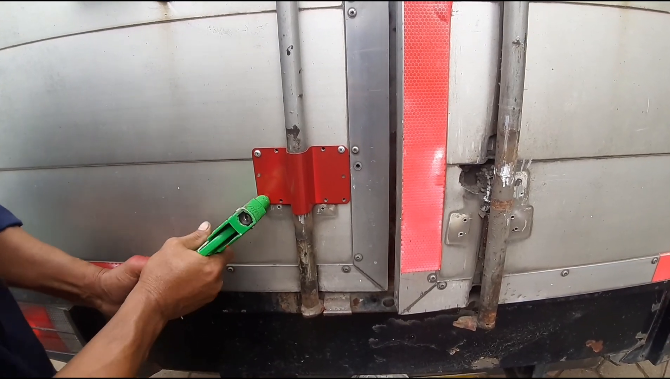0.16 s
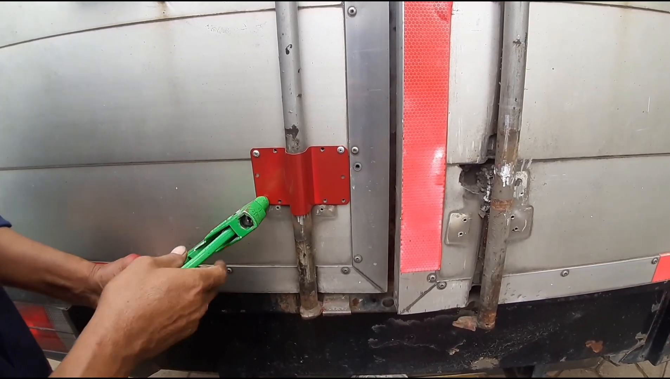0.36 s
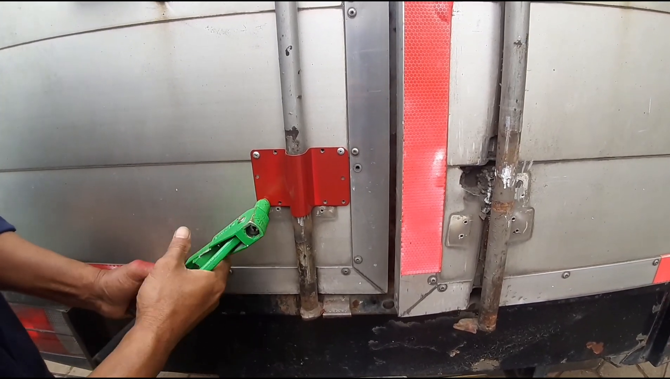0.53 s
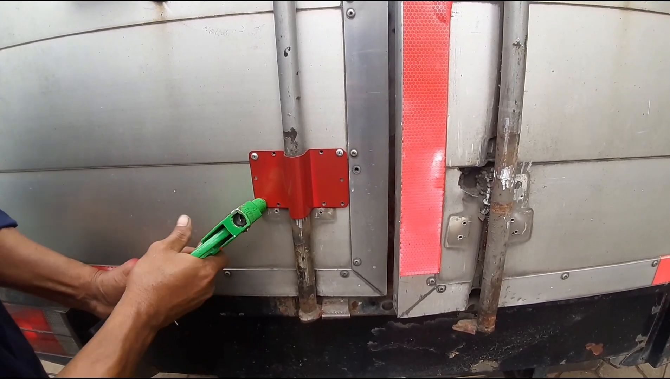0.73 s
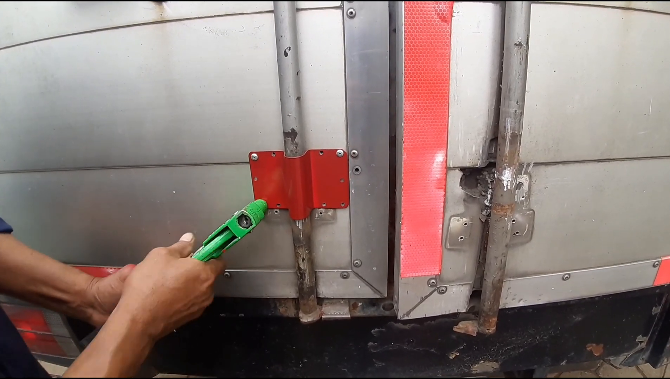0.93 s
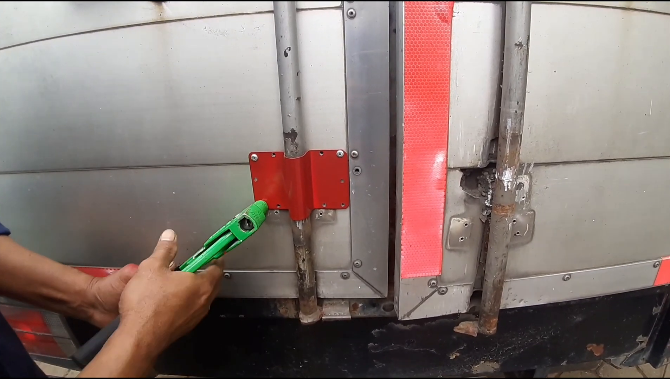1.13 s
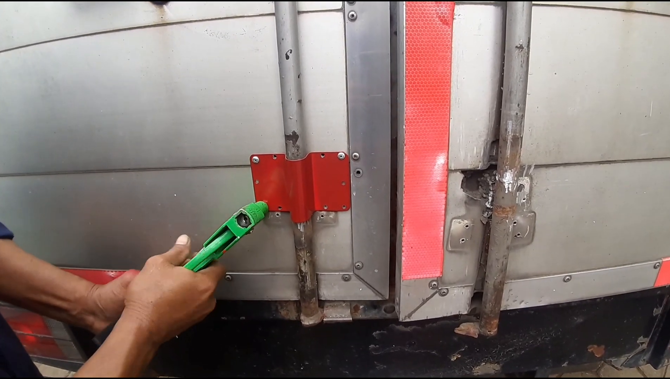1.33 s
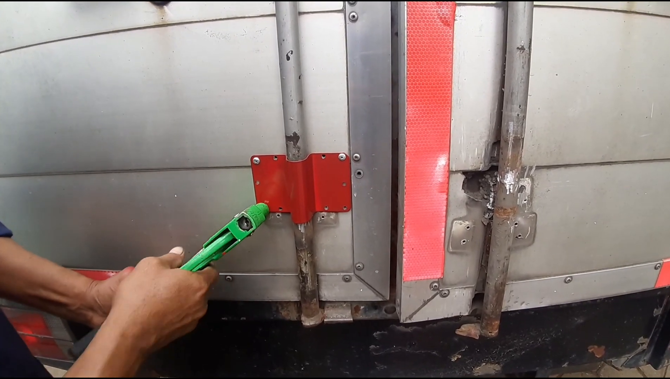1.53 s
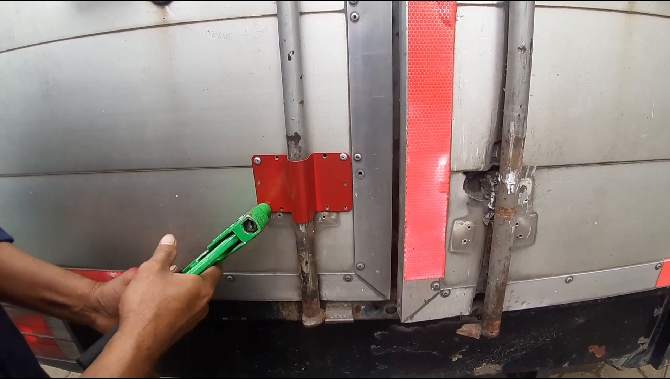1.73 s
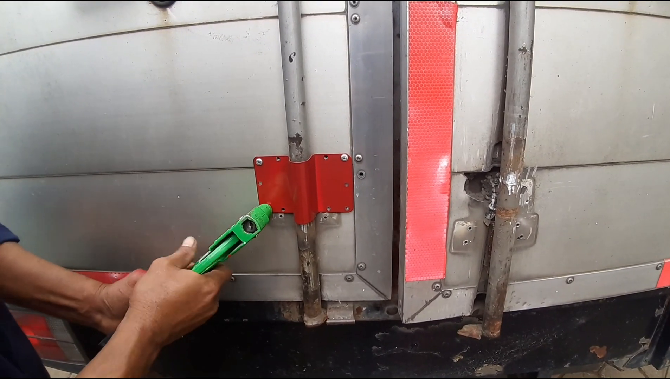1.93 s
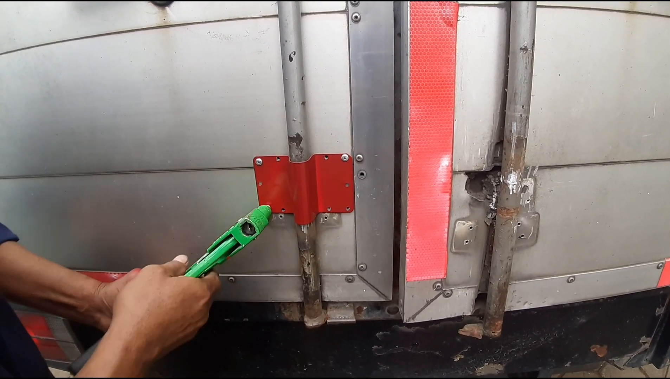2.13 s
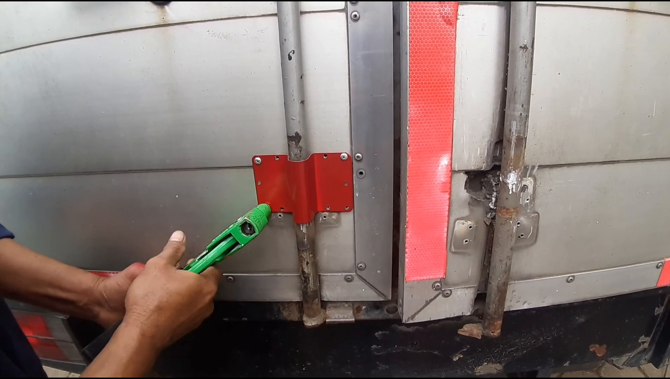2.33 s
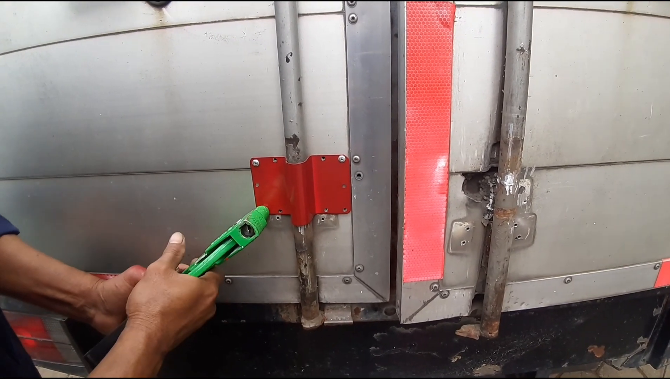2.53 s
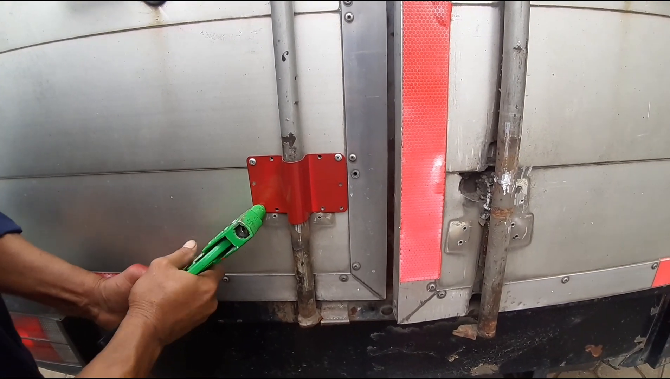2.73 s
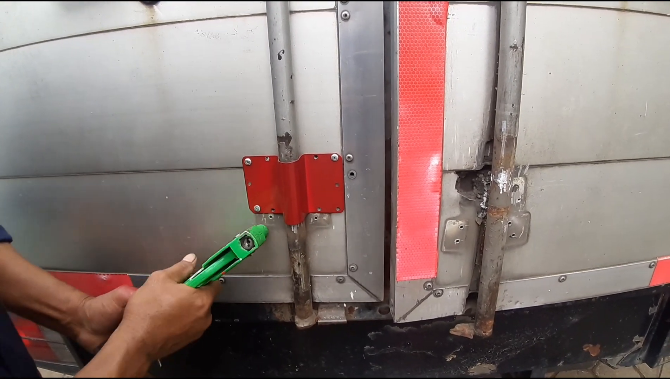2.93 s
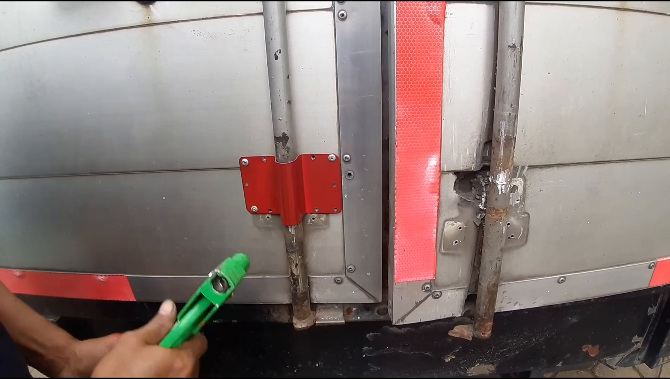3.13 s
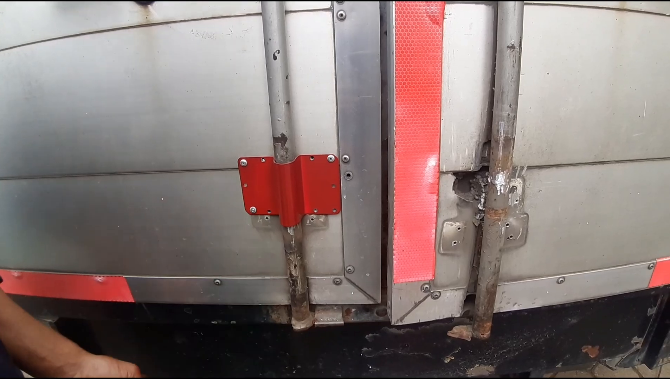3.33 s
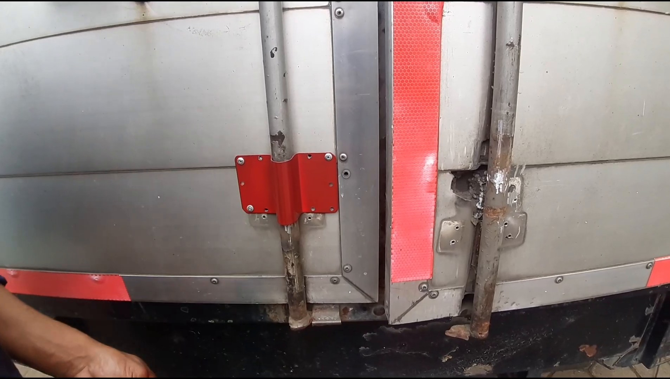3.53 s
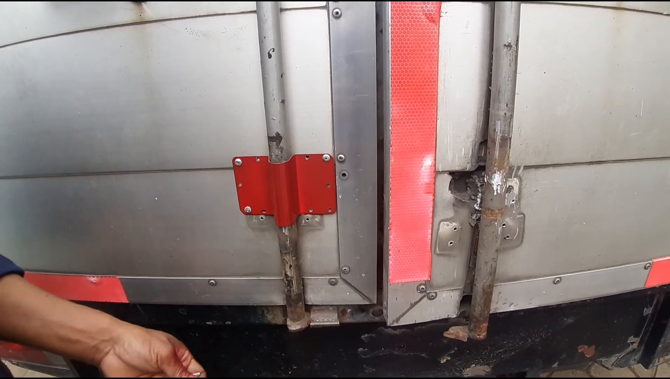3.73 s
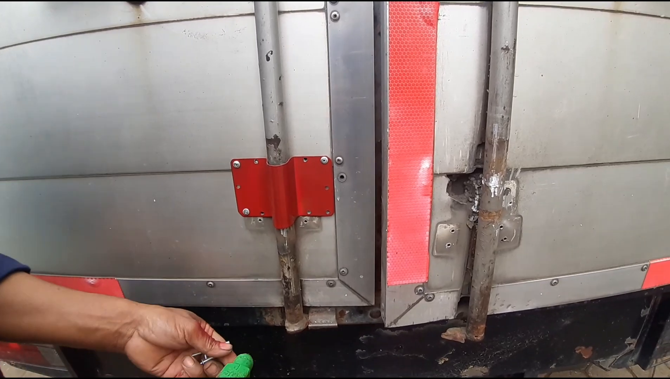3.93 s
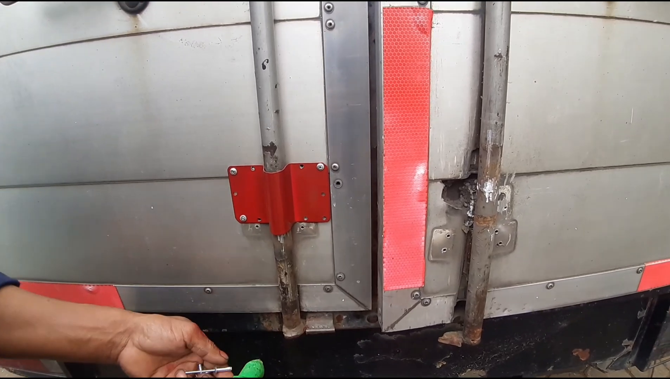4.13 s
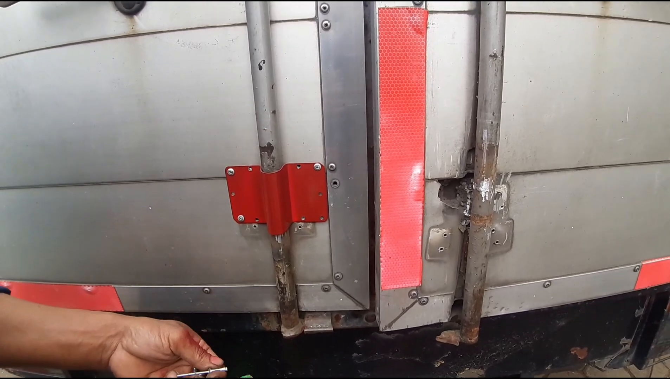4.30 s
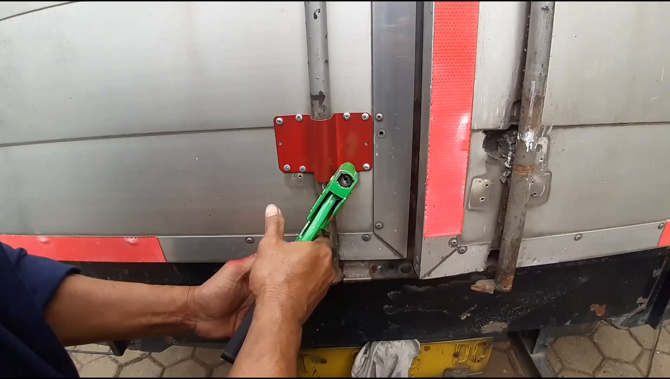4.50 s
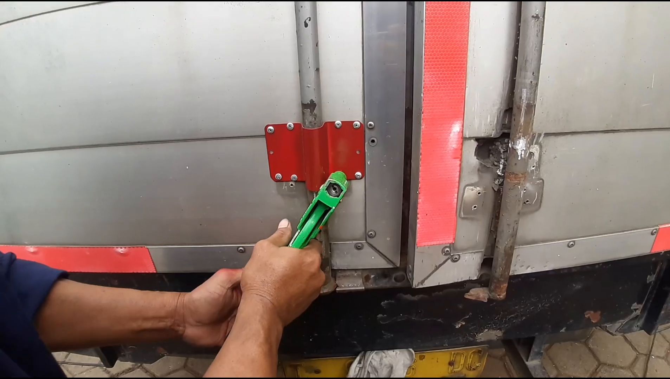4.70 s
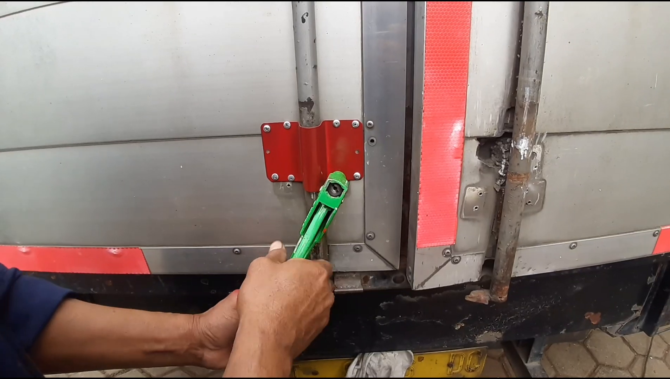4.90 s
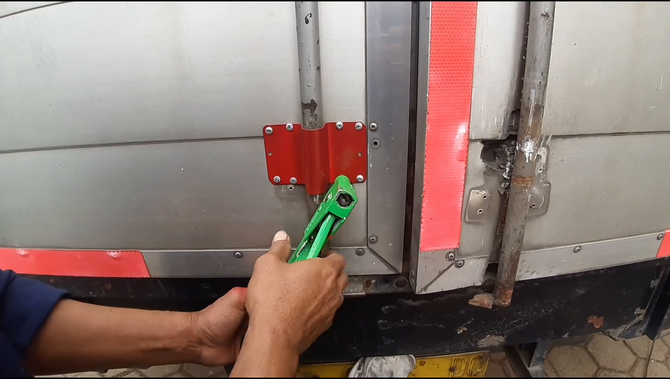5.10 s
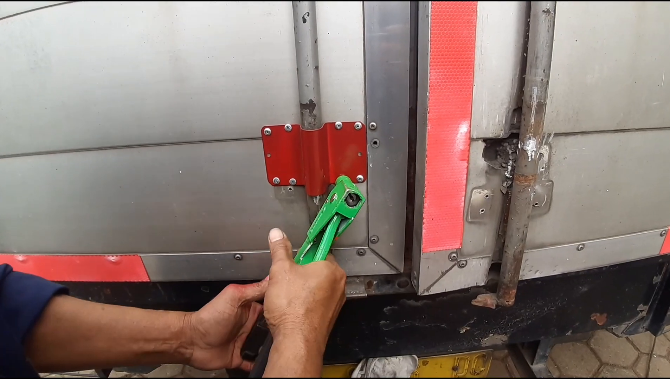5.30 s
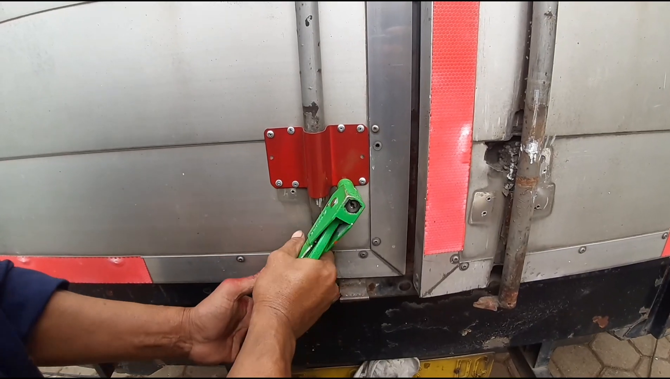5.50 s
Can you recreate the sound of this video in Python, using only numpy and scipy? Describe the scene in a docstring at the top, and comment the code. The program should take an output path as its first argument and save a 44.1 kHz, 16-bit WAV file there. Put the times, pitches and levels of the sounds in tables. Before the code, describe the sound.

Metallic ratcheting clacks of a hand riveter thud into hollow sheet metal, a hard crack follows, loose metal clinks, and riveting resumes.

```python
"""A hand rivet gun is pumped against a steel plate on the sheet-metal door of a truck, in a workshop yard.
Each stroke clicks, slips and stops in the gun (short shaped noise, ringing modes) and booms in the door
(slower shaped noise, modes); then the mandrel snaps. Linkage, spring and handle tick and ring.
Loose metal clinks as the gun is reloaded, and the nose is set on the next rivet.
Rumble and hiss (filtered noise) rise while the gun is held against the door."""
import sys
import numpy as np
from scipy import signal
from scipy.fft import rfft, irfft, next_fast_len
from scipy.io import wavfile
from scipy.ndimage import uniform_filter1d, map_coordinates

SR = 44100
rng = np.random.default_rng(int(sys.argv[2]) if len(sys.argv) > 2 else 0)


def transcribe(u):
    """Save the signal u as a 16-bit wav file named by the first command-line argument.

    u: samples, shape (n,) or (channels, n), limited to [-1, 1]; the rate is SR.
    q: integer samples, one column per channel.
    """
    v = np.clip(np.atleast_2d(u).T, -1, 1)
    q = np.round(v * 32767).astype(np.int16)
    wavfile.write(sys.argv[1], SR, q)


N = 244799
HIT_SIZE = 20000  # samples

# levels in all tables are relative
# spectrum of the sharp edge of a contact: f/Hz, level/dB
EDGE_SPECTRUM = [(7000, -31), (9500, -10), (12000, 1.5), (16000, -2.5)]


def from_db(db):
    """Decibels to gain."""
    return 10 ** (np.asarray(db) / 20)


def at_hz(points, size):
    """A table over log frequency, read at the bins of a transform."""
    hz, value = np.transpose(points)
    bin_hz = np.arange(size // 2 + 1) * SR / size
    return np.interp(np.log(bin_hz + 1), np.log(hz), value)


def causal(magnitude):
    """Causal (minimum-phase) filter with the given magnitude, by folding the cepstrum."""
    cepstrum = irfft(np.log(magnitude + 1e-12))
    half = len(cepstrum) // 2
    cepstrum[1:half] *= 2
    cepstrum[half + 1:] = 0
    return np.exp(rfft(cepstrum))


def colour(x, points):
    """Filter a signal by a spectrum."""
    size = 2 * next_fast_len(x.shape[-1] // 2 + HIT_SIZE // 8)
    response = causal(from_db(at_hz(points, size)))
    return irfft(rfft(x, size) * response, size)[..., :x.shape[-1]]


def resonate(burst, spectrum, count):
    """A burst takes on a body's spectrum; only detail finer than count bins is left to chance."""
    bins = rfft(burst)
    power = uniform_filter1d(np.mean(np.abs(bins) ** 2, axis=0), count)
    wanted = from_db(at_hz(spectrum, burst.shape[-1]))
    return irfft(bins * causal(wanted / np.sqrt(np.abs(power) + 1e-12)))


def diffuse(size):
    """Stereo noise, alike in the bass and unrelated in the treble."""
    # likeness of diffuse sound at the two ports: f/Hz, likeness/0-1
    likeness = [(100, 1), (300, 0.94), (700, 0.68), (1300, 0), (2500, 0.09), (16000, 0)]
    alike = np.clip(at_hz(likeness, size), 0, 1)
    mid, side = rfft(rng.standard_normal((2, size)))
    return irfft(np.sqrt(1 + alike) * mid + np.sqrt(1 - alike) * side * [[1], [-1]], size)


def spread_over(x, seconds):
    """Scale to the energy of a signal of rms 1 that lasts so long."""
    energy = np.mean(np.sum(x ** 2, axis=-1))
    return x * np.sqrt(seconds * SR / (energy + 1e-20))


def add(out, s, x):
    """Mix a sound in at a time."""
    start = max(round(s * SR), 0)
    out[..., start:start + x.shape[-1]] += x[..., :N - start]


def fade(t60_s, size=HIT_SIZE):
    """Exponential decay."""
    return np.exp(-np.log(1000) * np.arange(size) / SR / max(t60_s, 1e-3))


def swell(rise_s):
    """Build-up of a vibration that spreads through a body."""
    return 1 - np.exp(-np.arange(HIT_SIZE) / SR / max(rise_s, 1e-5))


def ring(times, levels_db, modes, vary_db):
    """Decaying sines: each blow strikes every mode with a strength of its own."""
    out, t = np.zeros(N), np.arange(HIT_SIZE) / SR
    shapes = np.array([from_db(db) * fade(t60_s) * np.sin(2 * np.pi * hz * t) for hz, db, t60_s in modes])
    strengths = from_db(vary_db * rng.standard_normal((len(times), len(modes))))
    for s, db, strength in zip(times, levels_db, strengths):
        add(out, s, from_db(db) * (strength @ shapes))
    return out


def ticks(times, levels_db, t60s, spectra, own=0.88, size=3072):
    """Hard contacts: a crowd of modes damped within milliseconds, radiating unevenly to the two ports."""
    out = np.zeros((2, N))
    for s, db, t60_s, spectrum in zip(times, levels_db, t60s, spectra):
        noise = rng.standard_normal((3, size))
        burst = (noise[0] + own * noise[1:]) * fade(t60_s, size)  # shared noise + each port's own
        tick = resonate(burst, spectrum, count=71)
        add(out, s, from_db(db) * spread_over(tick, .005))
    return out


def sheet(times, levels_db, spectrum, envelope, count):
    """Blows on sheet metal: dense modes radiating from the whole surface."""
    out = np.zeros((2, N))
    for s, db in zip(times, levels_db):
        burst = resonate(diffuse(HIT_SIZE) * envelope, spectrum, count)
        add(out, s, from_db(db) * spread_over(burst, .05))
    return out


def in_yard(x, wet_db, t60_s, rise_s, far_db=-24, far_t60_s=0.99):
    """Direct sound from a little to the left, reflections off the door, then a faint tail from far walls."""
    # where the gun is, as the lead of the left port: t/s, lead/s
    left_lead = [(0, .00013), (3.1, .00011), (4.0, 0.000081), (4.5, 0.000074), (5.55, 0.000058)]
    n = np.arange(N)
    lead_samples = np.interp(n / SR, *np.transpose(left_lead)) * SR
    direct = np.array([x[0], map_coordinates(x[1], [n - lead_samples], order=3)])
    decay = (fade(t60_s) + from_db(far_db) * fade(far_t60_s)) * swell(rise_s) ** 2
    echoes = spread_over(diffuse(HIT_SIZE) * decay, 1 / SR)
    return direct + from_db(wet_db) * signal.fftconvolve(x, echoes, axes=1)[:, :N]


def background():
    """Low rumble and a soft hiss, both stronger while the gun is pressed on the door."""
    # gun held against the door: start/s, end/s
    press_spans = [(0.0, 2.45), (4.489, 5.55)]
    # noise spectra: f/Hz, level/dB
    rumble_spectrum = [(20, -23), (40, -11), (60, -3), (100, 0.5), (140, -3), (250, -6), (400, -10.5),
                       (800, -18.5), (1500, -35), (5000, -35.5)]
    hiss_spectrum = [(400, -4.5), (1200, 1), (3000, 2), (3600, -2), (3880, -2), (4200, -3), (7500, -4),
                     (10000, -14), (16000, -14)]
    attack_s, release_s = 0.057, 0.9
    rumble_db, rumble_rise_db = -53.5, 11.5
    hiss_db, hiss_rise_db = -56, 11

    t = np.arange(N) / SR
    pressed = np.zeros(N)
    for start, end in press_spans:
        pressed += np.interp(t, [start - attack_s, start, end, end + release_s], [0, 1, 1, 0])

    def noise(spectrum):
        """Steady diffuse noise of rms 1."""
        return spread_over(colour(diffuse(next_fast_len(N))[:, :N], spectrum), N / SR)

    rumble = from_db(rumble_db + rumble_rise_db * pressed) * noise(rumble_spectrum)
    hiss = from_db(hiss_db + hiss_rise_db * pressed) * noise(hiss_spectrum)
    return rumble + hiss


def loose_metal():
    """A steel pin rings freely; something hard put down nearby clacks, duller, through the yard."""
    # pin clinks, clacks: t/s, level/dB
    clinks = [(3.943, -33.5), (3.972, -24), (4.415, -46)]
    clacks = [(4.0982, -18), (4.150, -33)]
    # impact spectra: f/Hz, level/dB
    pin_spectrum = [(1500, -12), (3500, -5), (4200, -1.5), (6000, -5.5), (8000, -0.5), (16000, -5.5)]
    clack_spectrum = [(80, -26), (280, -7), (450, 6), (850, 9.5), (1300, 4), (2300, 9.5), (3300, 3.5),
                      (5000, 0.5), (7000, 4), (10000, -2), (16000, -5)]
    # modes: f/Hz, level/dB, t60/s
    pin_modes = [(3330, -11, 0.15), (4040, -5, 0.14), (4050, -11, 0.11), (4550, -7.5, .15),
                 (5496, -10, 0.18), (6200, -12, 0.11), (6745, -16, 0.13), (7250, -18, 0.11),
                 (7795, -15, .2), (8120, 1, 0.077), (12760, -8, 0.23), (15100, -10, .1)]
    clack_modes = [(2240, -17, 0.25), (2520, -15, 0.12), (2760, -1.5, 0.061), (3300, -16, 0.28),
                   (3880, -6.5, 0.14), (5270, -16.5, 0.17), (6288, -28, 0.29), (6961, -24, 0.11),
                   (7601, -33, 0.51)]

    s, db = np.transpose(clinks)
    pin = ring(s, db - 8, pin_modes, vary_db=0.5)
    pin = pin + ticks(s, db - 2.0, np.full(len(s), .05), [pin_spectrum] * len(s))
    s, db = np.transpose(clacks)
    clack = ticks(s, db, np.full(len(s), .07), [clack_spectrum] * len(s))
    clack += ring(s, db - 7.5, clack_modes, vary_db=1.5)
    pin_heard = in_yard(pin, wet_db=-1.5, t60_s=0.14, rise_s=0.0013)
    return pin_heard + in_yard(clack, wet_db=-2.0, t60_s=0.22, rise_s=0.0012)


def singing_steel():
    """Close pairs of modes in the spring and the handle beat as they die away."""
    # spring set singing, handle swinging free: t/s, level/dB
    twangs = [(.366, -39), (1.003, -26.5), (1.4, -28.5), (1.59, -21.5), (2.16, -55), (2.815, -22)]
    handle_rings = [(0.481, -43), (1.129, -38), (2.81, -21), (3.224, -44.5), (3.531, -56), (5.097, -46)]
    # modes: f/Hz, level/dB, t60/s
    spring_modes = [(7700, -24, .25), (7833, 0.5, 0.16), (7970, 0, 0.14), (7860, -5, 0.15),
                    (8170, -14, .18)]
    handle_modes = [(3000, -18, .3), (3807, -3, 0.57), (3887, 9, 0.14), (3940, -7, 0.3)]
    spring = ring(*np.transpose(twangs), spring_modes, vary_db=4.0)
    handle = ring(*np.transpose(handle_rings), handle_modes, vary_db=0.5)
    both = from_db(-1.5) * spring + from_db(-5.5) * handle
    return in_yard(np.array([both, both]), wet_db=-13.5, t60_s=0.18, rise_s=0.0018)


def linkage():
    """Small loose parts tick, each around one short-lived pitch."""
    # ticks: t/s, level/dB, pitch f/Hz, sharp edge level/dB
    pings = [(0.65, -37, 8400, -58), (0.662, -26.5, 8430, -44), (0.727, -32, 6700, -41),
             (1.134, -27.5, 6680, -59), (1.2972, -31, 6680, -39), (1.726, -31, 6670, -41),
             (1.884, -31, 6730, -43), (2.301, -27.5, 6670, -40), (4.5115, -26, 6120, -34),
             (5.3573, -34, 6500, -38)]
    s, db, hz, edge_db = np.transpose(pings)
    bells = [[(0.3 * f, -32), (0.936 * f, -13), (f, 0), (1.055 * f, -12), (2.2 * f, -26)] for f in hz]
    t60s = np.full(len(s), .028)
    clicks = ticks(s, db + .5, t60s, bells) + ticks(s, edge_db + 8, t60s, [EDGE_SPECTRUM] * len(s))
    return in_yard(clicks, wet_db=-18.5, t60_s=0.26, rise_s=0.0015)


def hollow_note():
    """The nose drags on the plate and sets off its hollow note, a few damped modes."""
    # drags: t/s, level/dB
    drags = [(4.812, -25), (4.921, -31), (4.94, -33), (4.962, -15.5), (5.097, -31.5)]
    # modes: f/Hz, level/dB, t60/s
    hollow_modes = [(927, 3, 0.1), (989, -2, 0.053), (1100, -16, 0.065)]
    return ring(*np.transpose(drags), hollow_modes, vary_db=1)


def door(blows):
    """The plate answers quickly, with modes set by where it is struck; the wide panel builds up and booms."""
    # spectra of panel boom, plate knock, plate clank: f/Hz, level/dB
    boom_spectrum = [(30, -34.5), (55, -27), (80, -9.5), (100, 5.5), (135, -8), (165, -2), (200, -6),
                     (250, -7), (330, -8.5), (700, -49.5)]
    knock_spectrum = [(180, -20.5), (290, -2.5), (370, 4), (450, -1.5), (535, 2.5), (610, 5.5), (720, -9),
                      (900, -6.5), (2000, -34.5)]
    clank_spectrum = [(450, -18), (760, -0.5), (930, 1), (1050, -1), (1300, -2.5), (1700, -10.5),
                      (4000, -37)]
    # modes of panel, plate struck at left edge, plate struck at right edge: f/Hz, level/dB, t60/s
    panel_modes = [(99, -3.5, 0.15), (117.5, -8, 0.48), (162.2, -1, 0.21), (234, -6, 0.23)]
    left_edge_modes = [(463, -10, 0.36), (529.6, -2.5, 0.21), (584, -7, 0.074), (621.5, 2, 0.18),
                       (715, -5, 0.13), (953, -14.5, 0.3)]
    right_edge_modes = [(370.4, 2.5, 0.2), (426, -3.5, 0.28), (930, 3.5, 0.071), (1200, -21, 0.14),
                        (1730, -13, 0.088), (1885, -2.5, 0.084), (2080, -10, 0.18), (2488, 1.5, .07)]
    move_s, panel_delay_s = 4.3, 0.00597  # the gun moves from left edge to right edge at move_s

    s, boom_db, knock_db, clank_db, ring_db = np.transpose(blows)
    boom = sheet(s, boom_db - 2.5, boom_spectrum, fade(0.28) * swell(0.0027), count=17)
    knock_envelope = (fade(0.06) + .5 * fade(0.34)) * swell(0.0013)
    knock = sheet(s, knock_db - 3.0, knock_spectrum, knock_envelope, count=55)
    clank_envelope = (fade(0.1) + 0.22 * fade(0.47)) * swell(0.00067)
    clank = sheet(s, clank_db - .8, clank_spectrum, clank_envelope, count=111)
    panel = ring(s + panel_delay_s, boom_db - 0.5, panel_modes, vary_db=3.5)
    left = s < move_s
    plate = ring(s[left], ring_db[left], left_edge_modes, vary_db=1.5)
    plate += ring(s[~left], clank_db[~left] + 2.0, right_edge_modes, vary_db=1.5)
    return boom + knock + clank + panel + plate


def gun(contacts):
    """Every contact sounds the frame, the nose and the jaws; the steel parts ring on."""
    # part spectra: f/Hz, level/dB
    frame_spectrum = [(600, -0.5), (1300, -3.5), (1850, 4), (2450, 5.5), (3200, 3), (3800, -2),
                      (6000, -30.5)]
    nose_spectrum = [(2600, -26), (3600, -5), (3950, 5), (4250, 0), (4600, -1), (5200, -5), (7000, -29.5)]
    jaws_spectrum = [(3600, -14), (5100, -5.5), (5900, 0.5), (6400, -4), (7000, -1.5), (8100, -5),
                     (9500, -9.5), (16000, -16)]
    # modes: f/Hz, level/dB, t60/s
    nose_modes = [(1710, 10, .1), (2960, -6.5, .18), (3930, -26, .22), (3700, 0, 0.21), (4580, -21, .15)]
    jaw_modes = [(5630, -18, .2), (5965, -17, 0.12), (6247, -16, 0.12), (6700, 9, 0.2), (7060, -30, 0.15),
                 (7600, -22, 0.25)]
    # t60 of frame, nose, jaws, sharp edge, as share of the contact's t60
    ring_shares = (1.7, 0.85, 0.79, 1)

    s, frame_db, nose_db, jaws_db, edge_db, t60s = np.transpose(contacts)
    parts = [(frame_db - .8, frame_spectrum), (nose_db - 1.5, nose_spectrum),
             (jaws_db - .8, jaws_spectrum), (edge_db + 9, EDGE_SPECTRUM)]
    clicks = np.zeros((2, N))
    for (db, spectrum), share in zip(parts, ring_shares):
        clicks += ticks(s, db, t60s * share, [spectrum] * len(s))
    rings = ring(s, nose_db - 30.5, nose_modes, vary_db=4)
    rings += ring(s, jaws_db - 43, jaw_modes, vary_db=4)
    return in_yard(clicks + rings, wet_db=-10.5, t60_s=0.27, rise_s=0.00035)


def contact(kind, base_t60_s, s, db, hardness_db=0, extra_edge_db=0):
    """One contact, brighter and shorter if harder: (s, frame dB, nose dB, jaws dB, edge dB, t60 s)."""
    # by kind: frame level/dB, nose level/dB, jaws level/dB, sharp edge level/dB
    shares = {"seat": (-8, 1, 0, -12), "slip": (-4.5, -4, 3.5, -21), "stop": (0, 2.5, 3.5, -12),
              "grit": (-0.5, -9, -3, -20), "release": (-7.5, 1.5, -3, -10), "knock": (-1.5, 0.5, -4.5, -29),
              "snap": (0, 0, 1, -13.5), "rattle": (2, 0.5, 0, -16.5)}
    brightening = np.array([0, 1, 1.2, 1.7])  # dB per dB of hardness: frame, nose, jaws, edge
    shortening = .45  # dB of ring time lost per dB of hardness
    frame_db, nose_db, jaws_db, edge_db = db + np.array(shares[kind]) + hardness_db * brightening
    t60_s = base_t60_s * from_db(-shortening * max(hardness_db, 0))
    return s, frame_db, nose_db, jaws_db, edge_db + extra_edge_db, t60_s


def blow(kind, s, db):
    """One blow on the door: (s, panel boom dB, plate knock dB, plate clank dB, plate ring dB)."""
    # by kind: panel boom level/dB, plate knock level/dB, plate clank level/dB, plate ring level/dB
    shares = {"push": (2, -8, -13.5, -13), "stop": (1, -3.5, -7, -7.5), "knock": (-2, -0.5, -9, -6),
              "snap": (-7, -3, -5, -1.5)}
    return (s, *(db + np.array(shares[kind])))


def handling():
    """Knocks sound gun and door, rattles (and one clack's bright edge) only the gun, pushes only the door."""
    # nose knocks on plate: t/s, gun level/dB, hardness/dB, extra sharp edge level/dB, door level/dB
    knocks = [(0.076, -17.5, 6, 4, -26), (0.264, -29, -6.5, -3.5, -45), (0.557, -30, -11.5, -5, -31.5),
              (0.7869, -19, -8, -17, -26), (0.912, -44, -12, 0, -31), (0.926, -36, -2, 0, -33),
              (1.399, -15.5, 1, -10, -23), (1.502, -33.5, 1.5, 0, -36.5), (2.078, -32.5, -2.5, 12, -31),
              (2.106, -33, 6, 4, -31.5), (2.757, -19.5, -3, -14, -27), (4.53, -25, -5, 0, -27.5),
              (4.643, -21.5, 10.5, 2, -25.5), (4.8136, -33.5, 3.5, 1, -28), (5.186, -28, -6, -5, -30),
              (5.371, -26, 4.5, -8, -26.5), (5.4394, -24, 12, 1, -27)]
    # gun rattles in the hand; at 4.150 s the bright edge of the second clack: t/s, level/dB, hardness/dB
    rattles = [(0.3182, -40, 2), (0.964, -47, 10), (1.265, -48.5, 8), (1.51, -37.5, 2), (1.548, -36.5, 2),
               (2.277, -32.5, -1.5), (2.556, -58, 11.5), (2.6326, -48.5, 3), (3.172, -59, 4),
               (3.224, -48, 0.5), (3.241, -42, -4.5), (3.288, -63, 11), (3.771, -51, -8), (4.150, -57, 15),
               (4.287, -45, -18), (4.335, -65, 7), (4.386, -63.5, 8.5), (4.8359, -35.5, 5.5),
               (4.92, -42, 8.5), (5.092, -51, 14), (5.11, -49, 5.5)]
    # hand leans on the door through the gun: t/s, level/dB
    pushes = [(0.228, -34), (0.911, -33), (1.964, -47), (2.005, -40), (4.465, -37.5), (4.938, -34)]
    contacts = [contact("knock", 0.035, *row) for *row, _ in knocks]
    contacts += [contact("rattle", 0.036, *row) for row in rattles]
    blows = [blow("knock", s, door_db) for s, *_, door_db in knocks]
    blows += [blow("push", *row) for row in pushes]
    return contacts, blows


def snap(count=3):
    """Mandrel break and recoil each strike the door once; the gun chatters in quick, weakening bounces."""
    # break, recoil: t/s, gun level/dB, hardness/dB, door level/dB
    snaps = [(2.7916, -10.5, 1.5, -22), (2.8093, -11, 1.5, -16)]
    bounce_s, bounce_loss_db = .005, 4
    contacts, blows = [], []
    for s, db, hardness_db, door_db in snaps:
        for k in range(count):
            contacts.append(contact("snap", 0.045, s + k * bounce_s, db - k * bounce_loss_db, hardness_db))
        blows.append(blow("snap", s, door_db))
    return contacts, blows


def strokes(slip_count=3, grit_count=6):
    """The nose seats with a click, jaws slip and grind, the stop shakes the door, the handle drops back."""
    # one row per stroke: stop t/s, stop level/dB, door level/dB, seat lead/s, seat level/dB,
    # slipping length/s, slip level/dB, slip hardness/dB, release lag/s, release level/dB
    stroke_rows = [(0.3609, -22, -21.5, 0.03, -26, 0.01, -28.5, 1, 0.12, -28.5),
                   (1.0032, -20, -20, 0.029, -20, 0.012, -29.5, 9, 0.12, -28),
                   (1.5908, -22, -22.5, 0.034, -24.5, 0.016, -31, 10.5, .1185, -32.5),
                   (2.1585, -23.5, -22.5, .0275, -20.5, .0055, -30, 4, 0.12, -32.5),
                   (4.9625, -18, -19.5, 0.051, -35.5, 0.015, -24.5, -4.5, .1325, -27)]
    slip_growth_db, slip_jitter = 3, .05  # jitter: share of slipping length
    grit_db, grit_overrun_s = -9.5, .012  # level re stop; grinding goes on past it
    seat_push_db, release_push_db = -12, -16.5  # re stop's blow on the door

    contacts, blows = [], []
    for (s, stop_db, door_db, seat_lead_s, seat_db,
         slipping_s, slip_db, hardness_db, release_lag_s, release_db) in stroke_rows:
        seat_s, release_s = s - seat_lead_s, s + release_lag_s
        contacts.append(contact("seat", 0.037, seat_s, seat_db))
        slips_to_go = 1 - np.arange(slip_count) / slip_count + slip_jitter * rng.standard_normal(slip_count)
        for to_go in slips_to_go:
            level_db = slip_db + slip_growth_db * (.5 - to_go)
            contacts.append(contact("slip", 0.026, s - slipping_s * to_go, level_db, hardness_db))
        for share in (np.arange(grit_count) + rng.random(grit_count)) / grit_count:
            grit_s = s - slipping_s + share * (slipping_s + grit_overrun_s)
            contacts.append(contact("grit", 0.035, grit_s, stop_db + grit_db))
        contacts.append(contact("stop", 0.041, s, stop_db))
        contacts.append(contact("release", 0.059, release_s, release_db))
        blows.append(blow("push", seat_s, door_db + seat_push_db))
        blows.append(blow("stop", s, door_db))
        blows.append(blow("push", release_s, door_db + release_push_db))
    return contacts, blows


def scene():
    """All sources at the microphone."""
    contacts, blows = (np.vstack(rows) for rows in zip(handling(), snap(), strokes()))
    surroundings = background() + loose_metal()
    return surroundings + singing_steel() + linkage() + hollow_note() + door(blows) + gun(contacts)


def record(dry):
    """Each microphone port has its own colour; peaks are rounded and the top is cut."""
    # port responses: f/Hz, level/dB
    left_port = [(15, -20), (30, -18), (50, -1), (700, -2.5), (2400, -5), (4000, -3), (5200, -3),
                 (7000, -6), (8000, -14), (9300, -21), (11000, -11.5), (15000, -16)]
    right_port = [(15, -18.5), (30, -9.5), (50, -1.6), (700, -3), (2400, -3), (4000, -0.9), (5200, 2),
                  (7000, 5), (8200, 2.5), (9100, -7.5), (10200, -12.5), (12000, -4.5), (15000, -15.5)]
    cutoff_hz = 16300
    heard = np.array([colour(dry[0], left_port), colour(dry[1], right_port)])
    rounded = 1.203 * np.tanh(heard / 1.378)
    return signal.sosfilt(signal.ellip(10, .1, 90, cutoff_hz, fs=SR, output="sos"), rounded)


dry = scene()
out = record(dry)
transcribe(out)
```